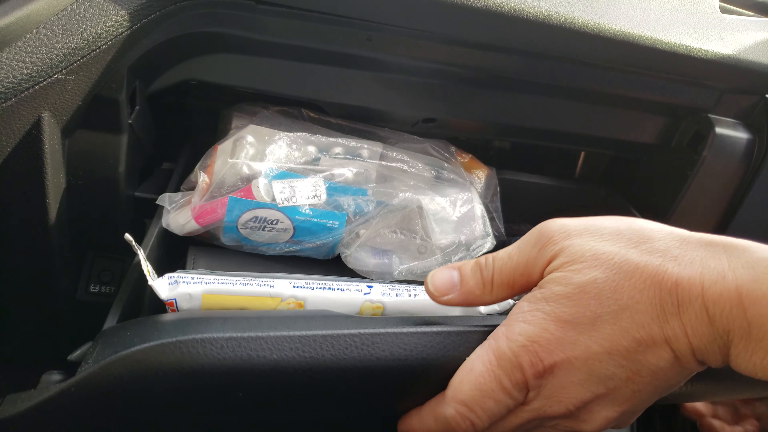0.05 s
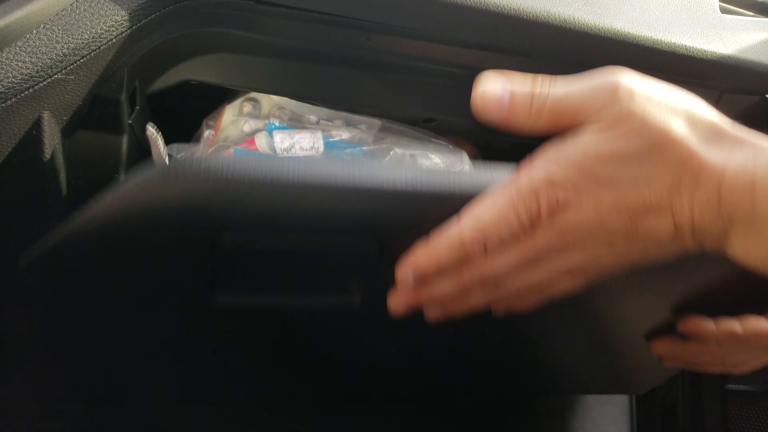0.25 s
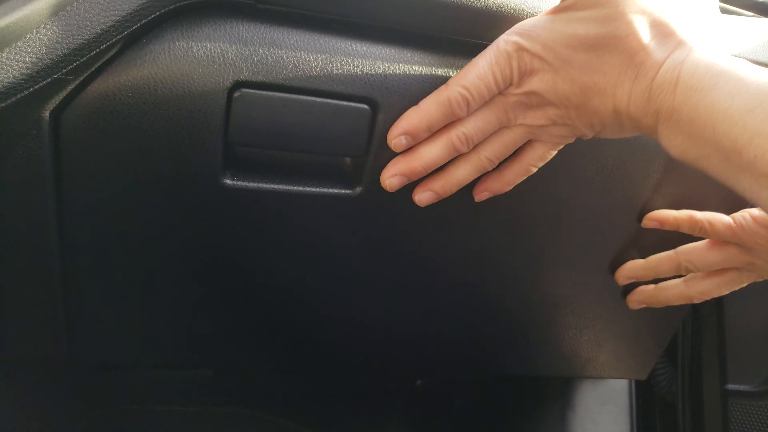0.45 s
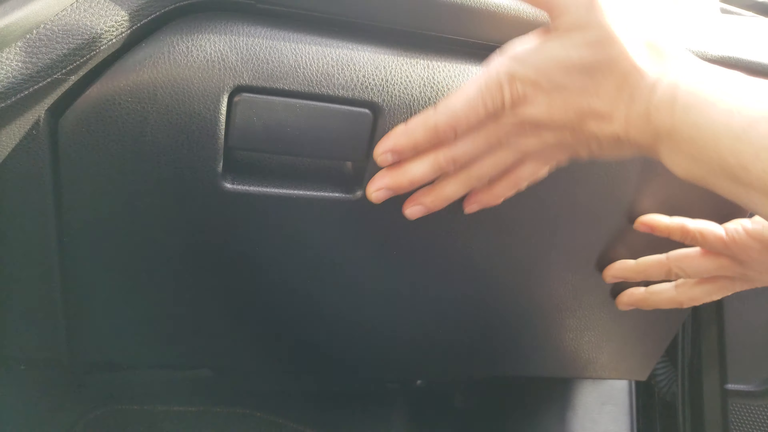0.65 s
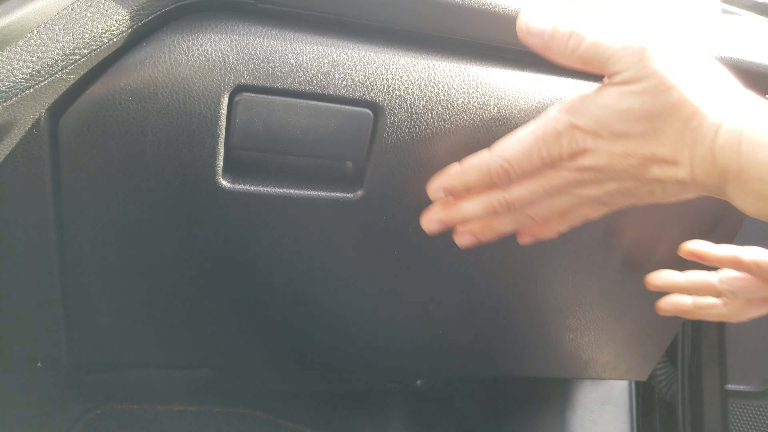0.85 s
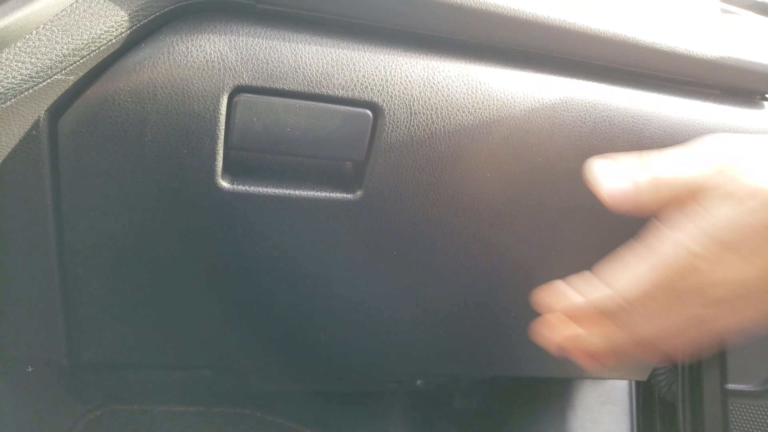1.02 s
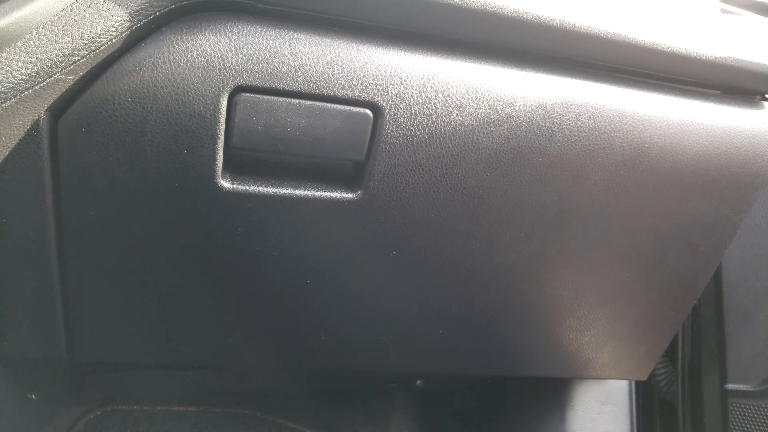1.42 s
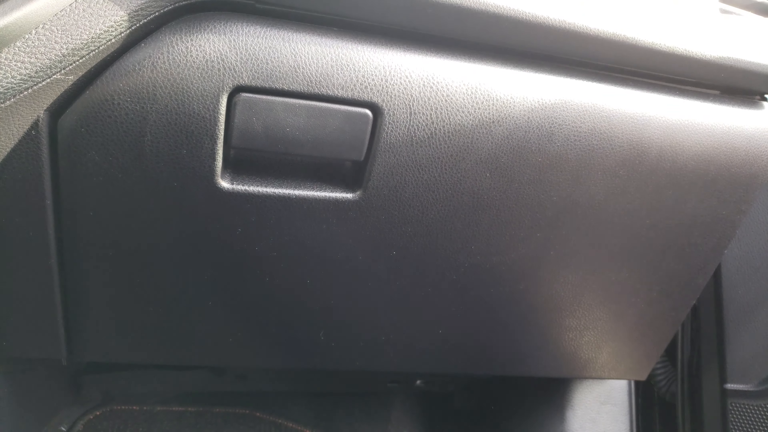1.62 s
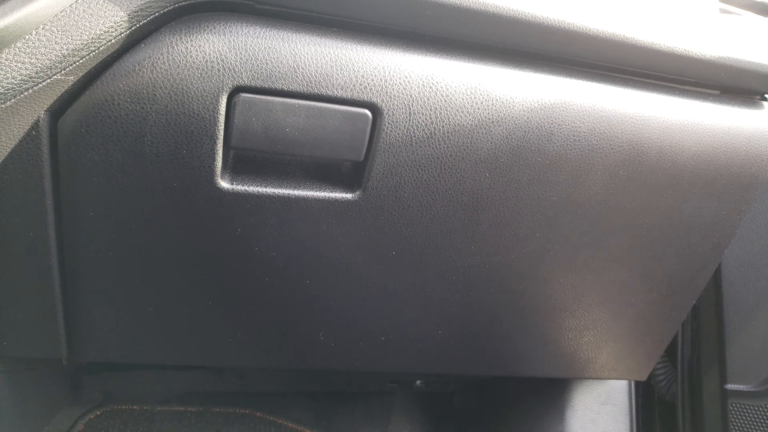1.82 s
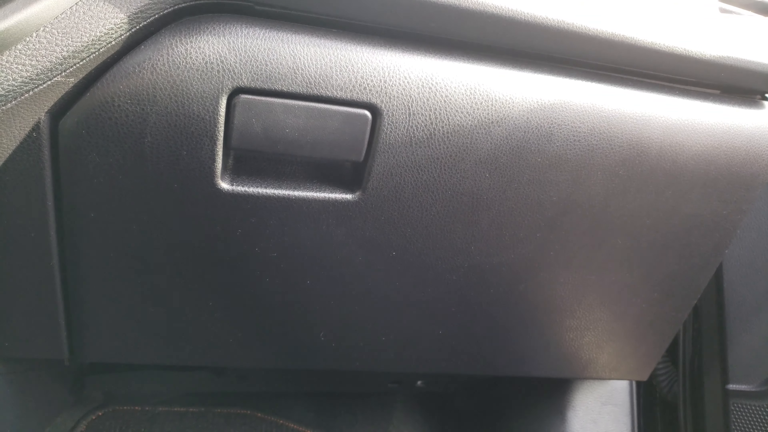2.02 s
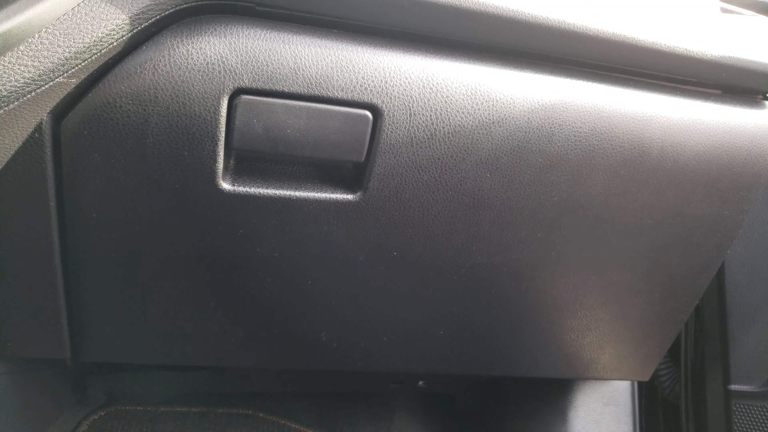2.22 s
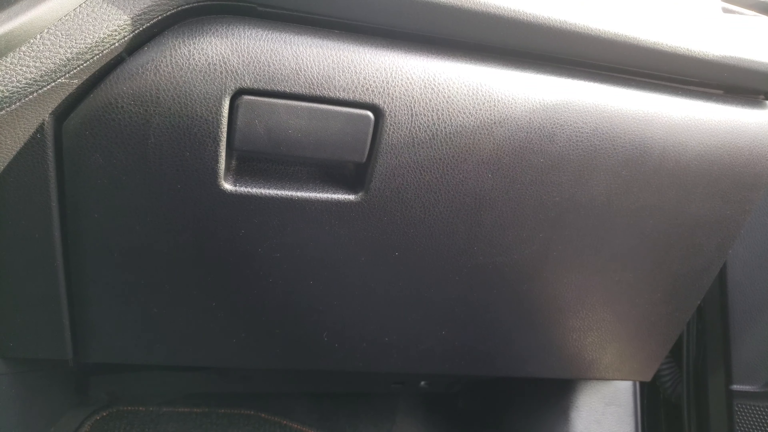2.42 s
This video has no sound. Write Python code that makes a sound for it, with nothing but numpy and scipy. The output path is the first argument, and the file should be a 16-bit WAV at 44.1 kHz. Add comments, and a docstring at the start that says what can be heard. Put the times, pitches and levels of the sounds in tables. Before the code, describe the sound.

A plastic glove box slams shut, loose items clattering inside before the latch clicks.

```python
"""A plastic glove box is swung shut in a parked car, close by and a little to the left.
Over quiet ventilation the lid rubs, the hinge clicks and a plastic bag slides inside. At a quarter
second the lid slams into the dashboard and the cabin booms briefly. Loose items tumble against
the wall, the lid is pressed home, the latch clicks and the plastic creaks faintly. The background
noise sinks after the hits, then swells as the recorder's gain recovers, with soft handling bumps."""
import sys
import numpy as np
from scipy import signal
from scipy.fft import rfft, irfft, next_fast_len
from scipy.io import wavfile
from scipy.ndimage import map_coordinates

SR = 44100
rng = np.random.default_rng(int(sys.argv[2]) if len(sys.argv) > 2 else 0)


def file_out(sig):
    """Save sig as 16-bit WAV at sys.argv[1]."""
    # one column per channel
    cols = np.atleast_2d(sig).T
    # limit, then scale
    lim = np.clip(cols, -1, 1)
    pcm = np.round(lim * 32767).astype(np.int16)
    wavfile.write(sys.argv[1], SR, pcm)


N = 112454

# Background level faders. Each row: time in seconds, then rumble, midrange rush and hiss in dB.
BACKGROUND_LEVELS = [(0, -47, -63.5, -61.5), (.6, -46, -64.5, -59.5), (.8, -58.5, -71, -74),
                     (.96, -57, -71.5, -91), (1.04, -53.5, -74, -76.5), (1.2, -58, -71, -78),
                     (1.38, -54.5, -69.5, -77), (1.55, -50.5, -63.5, -70), (1.7, -46, -60.5, -70),
                     (1.87, -46.5, -60, -65), (2.05, -43.5, -58.5, -70.5), (2.25, -45.5, -56, -68),
                     (2.36, -47, -59, -74), (2.45, -45, -56.5, -70.5), (2.55, -46, -60.5, -80)]
# Faders of the rubbing lid and the sliding bag. Each row: time in seconds, level in dB.
SWING_LEVELS = [(0, -54.5), (.04, -44), (.11, -57.5), (.16, -51.5), (.21, -42), (.245, -28.5), (.3, -46),
                (.39, -45.5), (.53, -59), (.61, -55), (.68, -57), (.78, -68)]
BAG_LEVELS = [(0, -62.5), (.065, -48), (.105, -67), (.15, -63), (.21, -49), (.245, -36), (.285, -30.5),
              (.31, -36.5), (.395, -36), (.42, -43), (.495, -42), (.525, -58), (.58, -57), (.64, -74),
              (.68, -69), (.725, -53.5), (.76, -84), (.92, -84)]

# Hinge and latch clicks, and sharp clicks of the lid striking its frame during the slam. Each row: start in
# seconds, body in dB, spike in dB.
CLICK_HITS = [(0.0487, -28, -16), (0.0521, -30.5, -24), (0.061, -31.5, -42), (0.213, -45, -40),
              (0.2468, -22, -19.5), (.2622, -24, -16.5), (0.304, -27.5, -40), (0.3217, -24.5, -26),
              (.432, -27, -34), (0.444, -31.5, -41), (0.4825, -21, -20.5), (0.7173, -28.5, -21.5),
              (.897, -63.5, -72)]
# The lid meets its frame. Each row: start in seconds, then thud, panel ring and crack in dB.
LID_HITS = [(0.2243, -30.5, -44, -48), (0.243, -23, -42, -38), (0.2468, -5.5, -22, -16.5),
            (0.2506, -12.5, -28, -31), (0.2559, -4, -14, -24.5), (0.2613, -11, -12, -18.5),
            (0.2651, -17.5, -13.5, -25), (0.2718, -22, -14, -21.5)]
# Loose items hit the bin. Each row: start in seconds, clack in dB, thump in dB.
ITEM_HITS = [(0.328, -44.5, -45.5), (0.382, -38.5, -52.5), (0.4329, -31, -38), (.4390, -43, -26.5),
             (0.455, -31.5, -38.5), (0.468, -25, -37), (0.4704, -21.5, -44), (0.4801, -23.5, -42),
             (.4825, -26, -46.5), (.4890, -32.5, -30), (0.5064, -50, -32.5), (0.703, -71, -38.5)]
# Hand bumps, dashboard booms, seating ticks and creaks. Each row: start in seconds, level in dB.
BUMP_HITS = [(.143, -41.5), (.166, -42), (1.829, -42.5), (1.925, -47), (2.150, -43), (2.432, -37)]
BOOM_HITS = [(0.267, -27), (0.479, -42), (.535, -33), (0.702, -38), (.755, -36)]
SEAT_HITS = [(.6595, -42), (.676, -49.5), (.7005, -42.5)]
CREAK_HITS = [(.762, -54), (.826, -60.5), (.897, -65.5)]

# Tone colours of the noise layers. Each row: frequency in Hz, gain in dB.
RUMBLE_EQ = [(20, -17), (55, -3.5), (75, -3.5), (108, 4), (150, -10), (210, -9.5), (300, -30), (600, -52)]
RUSH_EQ = [(100, -13), (210, -1.5), (330, -3.5), (560, -4.5), (720, -11.5), (1100, -15), (1800, -25),
           (5000, -55)]
HISS_EQ = [(500, -5), (1400, 2), (2600, -1), (4300, 1), (5700, -1.5), (7500, 3), (8800, -17), (12000, -2.5),
           (15500, -3.5)]
RUB_EQ = [(80, -18.5), (170, -6.5), (350, -1.5), (560, -2.5), (900, -17), (2000, -39.5), (5000, -72)]
CRINKLE_EQ = [(200, -16.5), (700, -0.5), (1300, 1.5), (4500, -2), (7400, -8), (8600, -20.5), (12000, -13.5),
              (15500, -16)]
SNAP_EQ = [(300, -34), (1500, -8.5), (2500, -15.5), (3800, -2), (6800, -1.5), (9000, -15.5), (12500, -11.5),
           (15500, -17.5)]
SPIKE_EQ = [(1000, -25), (3500, -1), (7000, -2), (9000, -14), (13000, -5), (15500, -6)]
BUMP_EQ = [(60, -18.5), (170, 3.5), (300, -4.5), (520, -7.5), (800, -24), (4000, -47.5), (9000, -70.5)]
KNOCK_EQ = [(60, -33.5), (150, -6), (320, 0), (400, -6.5), (560, 5), (700, 2), (1100, -1), (2500, -29.5),
            (6000, -64)]
CRACK_EQ = [(200, -17), (700, -3), (1300, 6), (4000, -1), (7400, -9), (8400, -25.5), (11000, -20),
            (15500, -13.5)]
CLACK_EQ = [(150, -30), (400, -1), (1400, -1.5), (2700, -1.5), (3600, -8.5), (4600, -4), (7300, -8),
            (9500, -24.5), (13000, -9.5), (15500, -22)]
CREAK_EQ = [(500, -8), (1100, 7), (1500, 0), (2200, -33), (3500, -20), (12000, -38)]

# Tails of the noise bursts. Each row: frequency in Hz, seconds to fall 60 dB.
SNAP_DECAY = [(1000, 0.0097), (4000, 0.018), (14000, 0.0039)]
SPIKE_DECAY = [(3000, 0.0027), (14000, 0.0025)]
BUMP_DECAY = [(150, 0.14), (600, 0.06)]
LID_DECAY = [(200, 0.059), (5000, 0.065)]
ITEM_DECAY = [(2000, 0.07), (14000, 0.045)]
CREAK_DECAY = [(1000, 0.054), (4000, 0.071)]

# Resonances of the things in the bag. Each row: centre in Hz, width in Hz, gain in dB.
BAG_RESONANCES = [(1116, 100, -4), (1400, 150, 2.5), (2520, 90, -6), (2990, 68, 2.5), (4392, 60, -6.5)]
# Modes of the struck parts. Each row: pitch in Hz, level in dB, seconds to fall 60 dB.
PANEL_RING = [(120.9, -11.5, 0.17), (177, -6, 0.11), (207.3, 0.5, 0.055), (326, -7.5, 0.097),
              (420, -14, 0.12), (543, -10, 0.071), (635, -15, 0.095), (721, -24.5, 0.21), (888, -5, .035),
              (1099.5, -12, .11)]
BOOM_RING = [(50.5, -6, 0.42), (90.6, -4.5, 0.29)]
ITEM_RING = [(1054, 5, 0.08), (1210, 1, 0.06), (1403, 0.5, 0.062), (1680, 4.5, .07), (2592, -2.5, 0.1),
             (2620, -7.5, 0.1)]
BIN_RING = [(119, -4, 0.16), (135, 0, 0.083), (194.1, -2, 0.12)]
RIM_RING = [(594, 9.5, 0.025), (710, 2.5, 0.04), (1360, -3, 0.092), (2740, -10.5, 0.065),
            (3640, -11, 0.041)]

# Stereo image of box and background. Each row: frequency in Hz, left-right likeness (1 is mono).
BOX_LIKENESS = [(200, 1), (450, 0.32), (800, 0.63), (1500, 0.2), (14000, 0.14)]
BACKGROUND_LIKENESS = [(60, 0.94), (130, 0.96), (290, 1), (640, 0.097), (1400, 0)]
# Pan of the box. Each row: frequency in Hz, dB added on the left and taken from the right.
BOX_PAN = [(100, -1.5), (330, 2), (550, 0), (1000, 0.63), (14000, 1.47)]

CONTACT_RISE_S, RING_RISE_S = 0.00013, 0.0011


def amp(db):
    return 10 ** (np.asarray(db) / 20)


def unit_rms(x):
    return x / np.sqrt(np.mean(x ** 2) + 1e-20)


def along(points, hz):
    """Read (Hz, value) points on a log frequency axis."""
    f, values = np.transpose(points)
    return np.interp(np.log(hz + 1), np.log(f + 1), values)


def curves(rows):
    """One value per sample for each column after the time."""
    times, *columns = np.transpose(rows)
    return [np.interp(np.arange(N) / SR, times, column) for column in columns]


def movement(rows):
    """Gain that rides a fader and dies away after its last point."""
    overrun_s = np.maximum(np.arange(N) / SR - rows[-1][0], 0)
    return amp(curves(rows)[0]) * np.exp(-overrun_s / 0.052)


def wobble(rate):
    """A smooth random curve, rate knots a second."""
    return map_coordinates(rng.standard_normal(200), [np.arange(N) * rate / SR], mode="wrap")


def filtered(x, response):
    """Shape x with a frequency response."""
    n = x.shape[-1]
    padded = next_fast_len(n + 4096)
    return irfft(rfft(x, padded) * response(np.fft.rfftfreq(padded, 1 / SR)), padded)[..., :n]


def noise(eq, likeness=BOX_LIKENESS, size=N):
    """Coloured stereo noise of rms 1."""
    def response(hz):
        width = np.arccos(np.clip(along(likeness, hz), -1, 1)) / 2
        return amp(along(eq, hz)) * [np.cos(width), np.sin(width)]
    mid, side = filtered(rng.standard_normal((2, size)), response)
    return unit_rms(np.array([mid + side, mid - side]))


def burst(eq, decay, rise_s=CONTACT_RISE_S):
    """Dense resonances struck at once; each band dies at its own speed."""
    t = np.arange(SR // 3) / SR
    source = noise(eq, size=len(t))
    centres, t60s = np.transpose(decay)
    out = 0
    for share, t60 in zip(np.eye(len(centres)), t60s):
        band = filtered(source, lambda hz: along(np.c_[centres, share], hz))
        out += band * amp(-60 * t / t60)
    return out * (1 - np.exp(-t / rise_s))


def ring(modes, spread=0):
    """Damped modes with new levels for each blow; spread (radians) sets the two ears apart."""
    t = np.arange(SR) / SR
    out = 0
    for hz, db, t60 in modes:
        envelope = amp(db + 1.5 * rng.normal() - 60 * t / t60)
        out += envelope * np.sin(2 * np.pi * hz * t + spread * rng.normal(size=(2, 1)))
    return out * (1 - np.exp(-t / RING_RISE_S))


def add(out, start, x):
    """Mix x into out at start seconds."""
    part = out[:, max(round(start * SR), 0):][:, :x.shape[-1]]
    part += x[..., :part.shape[-1]]


def taps(hits, eq, decay, rise_s=CONTACT_RISE_S):
    """One burst of the same colour for each hit."""
    out = np.zeros((2, N))
    for start, db in hits:
        add(out, start, amp(db) * burst(eq, decay, rise_s))
    return out


def background(fan_hz=557):
    """The bed: low rumble, a soft rush of air, faint hiss and a thin fan tone that follows the rush."""
    rumble_db, rush_db, hiss_db = curves(BACKGROUND_LEVELS)
    fan_phase = 2 * np.pi * np.cumsum(fan_hz + 1.2 * wobble(40)) / SR
    fan_db = -68 + 0.79 * (rush_db - rush_db.mean()) + 3.1 * wobble(15)
    rush = amp(rush_db + wobble(25)) * noise(RUSH_EQ, BACKGROUND_LIKENESS)
    hiss = amp(hiss_db) * noise(HISS_EQ, BACKGROUND_LIKENESS)
    rumble = amp(rumble_db) * noise(RUMBLE_EQ, BACKGROUND_LIKENESS)
    return rumble + rush + hiss + amp(fan_db) * np.sin(fan_phase)


def lid_swing():
    """The swinging lid rubs with a dull scuff."""
    return movement(SWING_LEVELS) * noise(RUB_EQ)


def bag_slide(snaps_per_s=1500, spread_db=2, grain_s=0.0007, rattle_db=-5):
    """Thin film slides and crinkles; the same tiny snaps ring the things packed in it."""
    def contents(f):
        return sum(amp(db) * 1j * f * width / (hz ** 2 - f ** 2 + 1j * f * width)
                   for hz, width, db in BAG_RESONANCES)
    triggers = rng.random(N) < snaps_per_s / SR
    snaps = triggers * amp(spread_db * np.minimum(rng.exponential(size=N), 5))
    grains = unit_rms(signal.lfilter([1], [1, -np.exp(-1 / (grain_s * SR))], snaps))
    film = unit_rms((grains + 0.9) * noise(CRINKLE_EQ))  # crinkles over a steady slide
    rattle = unit_rms(filtered(snaps * noise(CRINKLE_EQ), contents))
    return movement(BAG_LEVELS) * (film + amp(rattle_db) * rattle)


def sharp_clicks():
    """Hinge, latch and the slamming lid's edge snap with a hard spike and a short body."""
    hits = np.array(CLICK_HITS)
    body = taps(hits[:, [0, 1]], SNAP_EQ, SNAP_DECAY)
    spike = taps(hits[:, [0, 2]], SPIKE_EQ, SPIKE_DECAY)
    return body + spike


def hand_bumps():
    """A soft hand meets the trim slowly, so the attack is rounded."""
    return taps(BUMP_HITS, BUMP_EQ, BUMP_DECAY, rise_s=0.0013)


def air_thud(peak_s=0.0017, width_s=0.00052):
    """The flexing lid pushes one rounded pulse of air with a dip on either side."""
    u = (np.arange(SR // 20) / SR - peak_s) / width_s
    return (1 - u ** 2) * np.exp(-u ** 2 / 2)


def lid_slam(knock_db=-12.5, low_cut_hz=89):
    """The lid chatters against its frame: each contact thuds, rings the panel, knocks and cracks."""
    panel, contact = np.zeros((2, 2, N))
    for start, thud_db, ring_db, crack_db in LID_HITS:
        add(panel, start, amp(thud_db) * air_thud())
        add(panel, start, amp(ring_db) * ring(PANEL_RING, spread=0.12))
        add(contact, start, amp(thud_db + knock_db) * burst(KNOCK_EQ, LID_DECAY))
        add(contact, start, amp(crack_db) * burst(CRACK_EQ, LID_DECAY))
    # The small panel radiates little deep bass.
    return contact + filtered(panel, lambda hz: hz ** 4 / (hz ** 4 + low_cut_hz ** 4))


def cabin_boom():
    """Dashboard and cabin air shudder after the heavier blows."""
    out = np.zeros((2, N))
    for start, db in BOOM_HITS:
        add(out, start, amp(db) * ring(BOOM_RING))
    return out


def loose_items(ring_db=-9):
    """Hard little items clack against the bin, ring and thump its hollow body."""
    out = np.zeros((2, N))
    for start, clack_db, thump_db in ITEM_HITS:
        add(out, start, amp(clack_db) * burst(CLACK_EQ, ITEM_DECAY))
        add(out, start, amp(clack_db + ring_db) * ring(ITEM_RING, spread=1.0))
        add(out, start, amp(thump_db) * ring(BIN_RING))
    return out


def lid_seating(crack_db=-1):
    """The pressed lid ticks into its seat and its rim rings woodily."""
    out = np.zeros((2, N))
    for start, db in SEAT_HITS:
        add(out, start, amp(db) * ring(RIM_RING, spread=0.7))
        add(out, start, amp(db + crack_db) * burst(CRACK_EQ, ITEM_DECAY))
    return out


def lid_creaks():
    """The shut lid creaks faintly as it settles."""
    return taps(CREAK_HITS, CREAK_EQ, CREAK_DECAY)


def pan_left(x, lead_s=0.00026):
    """The left ear hears the box earlier and, above the bass, mostly louder."""
    sides = np.array([[1], [-1]])
    return filtered(x, lambda hz: amp(along(BOX_PAN, hz) * sides)
                    * np.exp(1j * np.pi * hz * lead_s * sides))


def cabin_reverb(x, t60_s=0.12, wet_db=-26.5):
    """The short, padded answer of the car interior."""
    t = np.arange(SR // 2) / SR
    tail = rng.standard_normal((2, len(t))) * amp(-60 * t / t60_s)
    tail /= np.linalg.norm(tail[0])
    return amp(wet_db) * signal.fftconvolve(x, tail, axes=1)[:, :N]


def scene():
    """The mix: the box panned left with a touch of cabin, over boom, bumps and background."""
    box = lid_slam() + lid_swing() + lid_seating() + loose_items()
    box = pan_left(box + sharp_clicks() + lid_creaks() + bag_slide())
    return box + cabin_reverb(box) + cabin_boom() + hand_bumps() + background()


def record(dry):
    """The recorder stops at full scale and cuts the highest treble steeply."""
    top_hz = 15950
    return filtered(np.clip(dry, -1, 1), lambda hz: 1 / (1 + (hz / top_hz) ** 150))


dry = scene()
out = record(dry)
file_out(out)
```